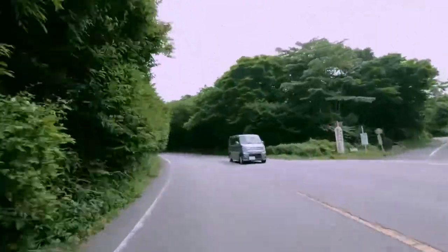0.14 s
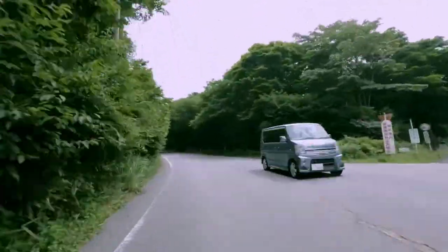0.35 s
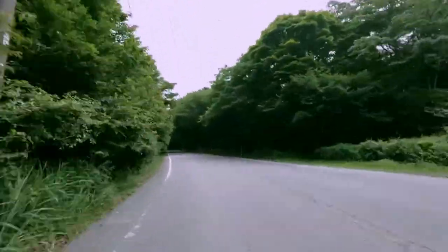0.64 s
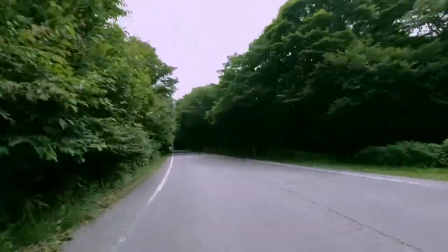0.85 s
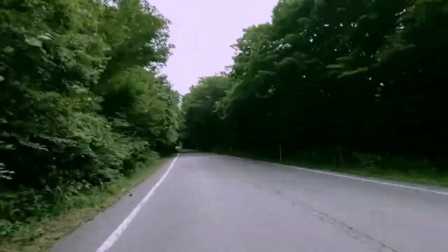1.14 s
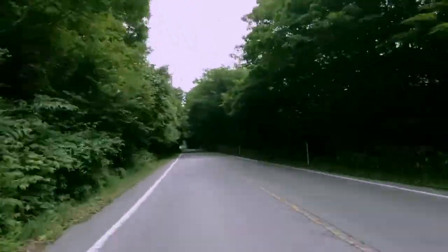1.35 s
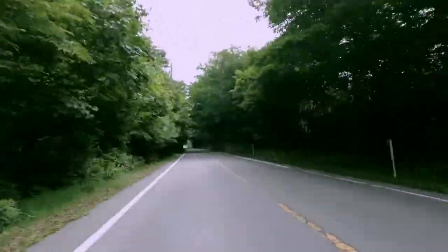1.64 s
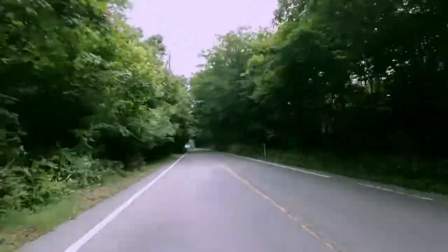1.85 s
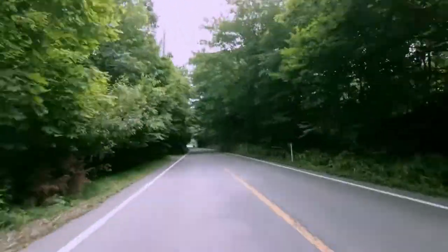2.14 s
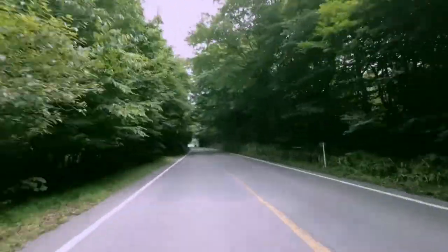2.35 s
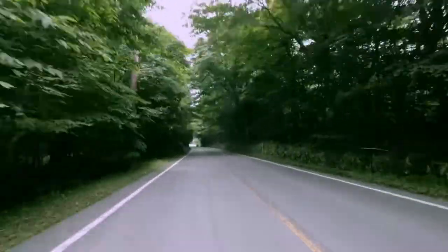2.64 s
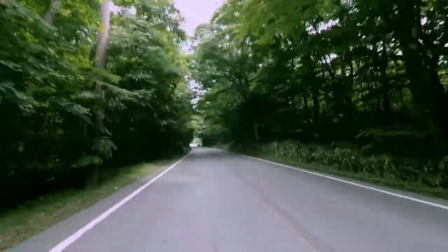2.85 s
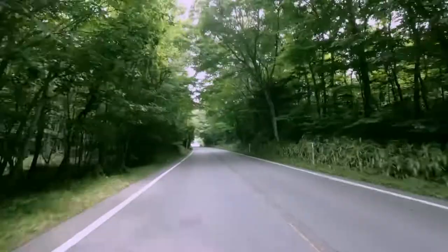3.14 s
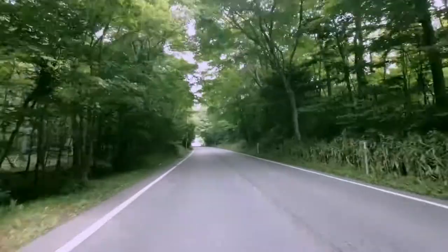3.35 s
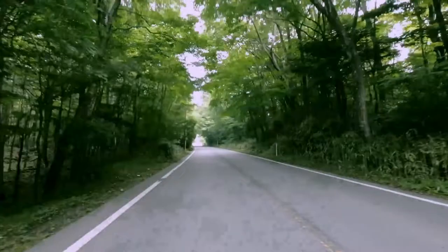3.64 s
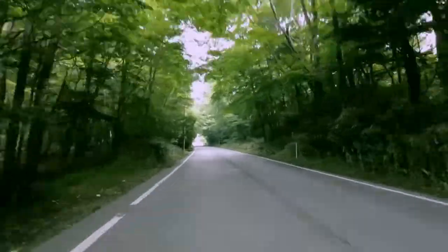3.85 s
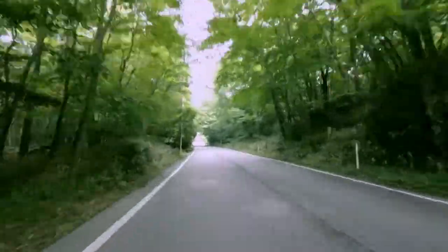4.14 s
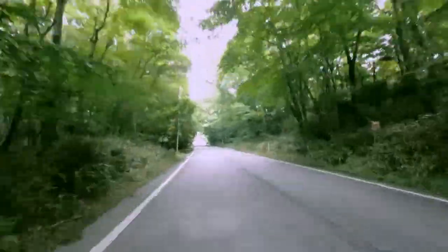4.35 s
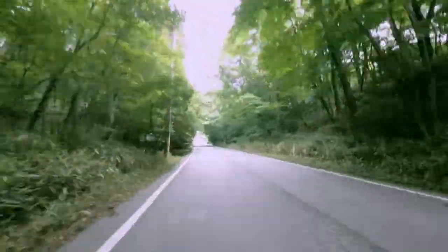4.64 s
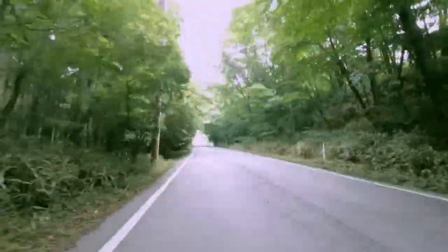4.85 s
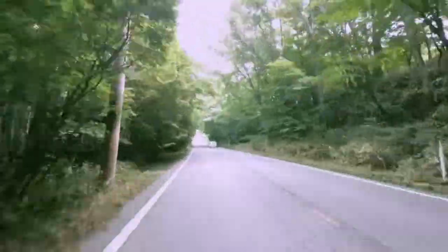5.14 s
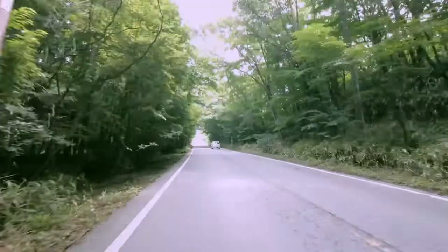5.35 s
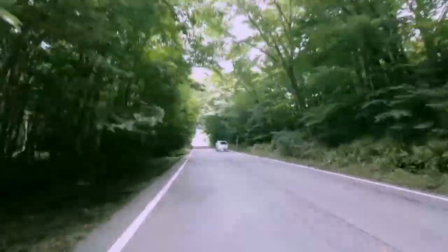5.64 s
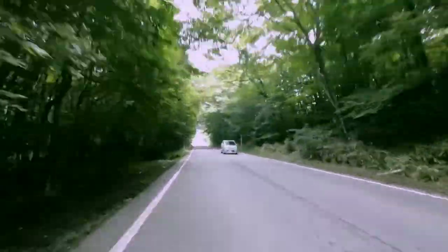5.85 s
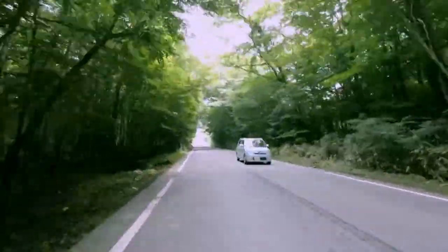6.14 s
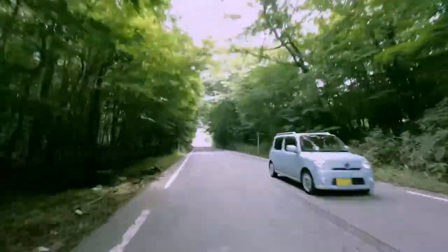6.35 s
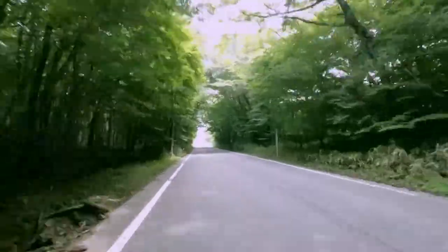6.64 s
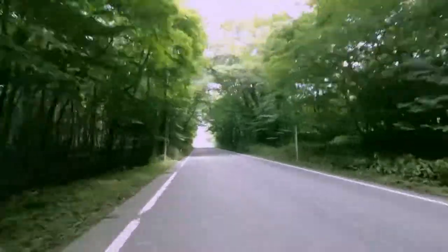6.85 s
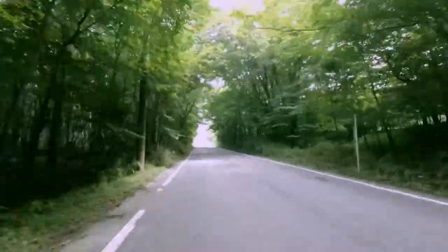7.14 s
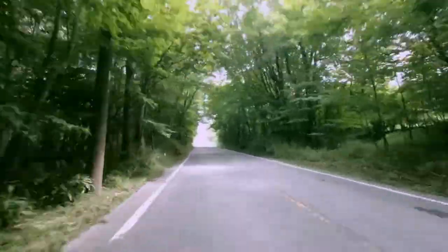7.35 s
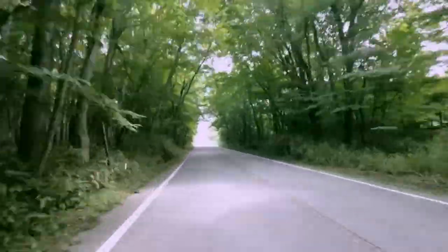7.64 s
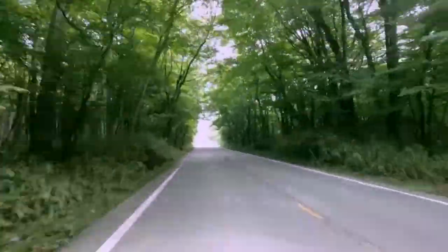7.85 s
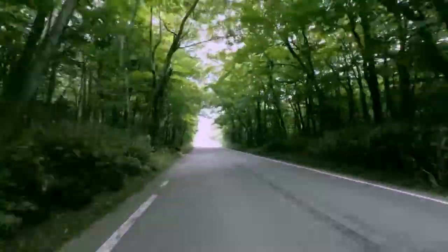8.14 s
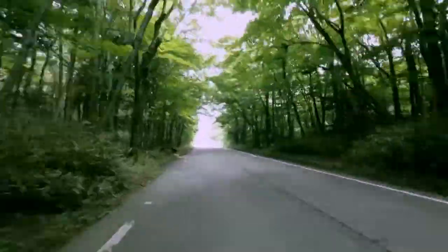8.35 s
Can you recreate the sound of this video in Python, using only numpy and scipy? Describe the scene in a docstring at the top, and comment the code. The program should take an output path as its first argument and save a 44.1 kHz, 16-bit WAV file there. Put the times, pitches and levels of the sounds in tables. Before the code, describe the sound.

A motorcycle ride on an open forest road, heard in mono from a microphone fixed to the bike, close and without noticeable echo. From 0 s the twin-cylinder engine is already running: a deep, muffled exhaust throb, two unevenly spaced pulses per cycle, about 23 cycles a second. A brief easing at 0.25 s is followed by firmer throttle from 0.4 to 1.3 s, then the load relaxes towards a light cruise by about 5.6 s. The pitch climbs smoothly throughout, reaching about 27 cycles a second by 8.5 s. Fine valve ticks, a dull knock, cycle-pulsed hiss, low hum, and thin high rings and whine overlay it. Tyre and air roar stays steady with slight flicker. Soft low wind thumps begin around 1.6 s, cluster with heavier buffeting from 6.2 to 7.4 s as air is stirred behind an oncoming car, then thin out. The engine continues to the end.

```python
"""The uneven beat of a twin-cylinder motorcycle's exhaust is heard first, over roaring tyres and wind; it slowly
gains speed on a forest road, the microphone riding on the bike. Two unevenly spaced firings a cycle excite the
modes of the exhaust; filtered noise and pulses locked to the cycle make pulsing hiss, thin rings and valve ticks;
sinusoids at multiples of the cycle rate make hum and steady high partials. Shaped noise gives the tyre and air
roar; low rumble and brief decaying oscillations give the wind and gusts thumping the microphone."""
import sys
import numpy as np
from scipy import signal
from scipy.fft import rfft, irfft, next_fast_len
from scipy.io import wavfile
from scipy.ndimage import uniform_filter1d

SR = 44100
rng = np.random.default_rng(int(sys.argv[2]) if len(sys.argv) > 2 else 0)


def log_audio(samples):
    """Write samples as a 16-bit WAV file to the path given in sys.argv[1]."""
    # one column per channel
    frames = np.atleast_2d(samples).T
    # limit to full scale, then quantise
    limited = np.clip(frames, -1, 1)
    pcm = np.round(limited * 32767).astype(np.int16)
    wavfile.write(sys.argv[1], SR, pcm)


N = 374850

# Rate of the four-stroke cycle: [t/s, f/Hz]
CYCLE_RATE = [(0.0, 23.262), (0.4, 23.526), (0.8, 23.817), (1.2, 24.178), (1.7, 24.546), (2.3, 24.825),
              (3.0, 25.074), (3.8, 25.478), (4.6, 25.846), (5.4, 26.126), (6.2, 26.369), (7.0, 26.636),
              (7.8, 26.868), (8.5, 27.052)]
# Engine load, a squeeze of throttle out of the bend, then easing to a cruise: [t/s, load from 0 to 1]
ENGINE_LOAD = [(0, 0.8), (.25, .55), (.4, .95), (1.3, 0.8), (1.9, 0.41), (3, 0.27), (4.5, .22), (5.6, 0.08),
               (8.5, 0.01)]
# Relative spectrum of tyres, air and microphone hiss: [f/Hz, density level/dB per Hz]
ROAD_SPECTRUM = [(90, -11), (150, -8.5), (290, -13), (360, -16), (490, -13.5), (830, -18), (1100, -19),
                 (1600, -33), (2300, -37), (3100, -39.5), (4100, -44), (5700, -49.5), (8300, -53.5),
                 (12000, -52), (14000, -71), (15600, -54)]
# Gust thumps: [t/s, level/dB before the wind low-pass, f/Hz, 1/e half-length/s]
GUST_THUMPS = [(1.558, -22, 42, .009), (1.787, -23, 54, .009), (2.545, -21, 119, .008),
               (2.637, -26, 58, .01), (3.232, -25, 63, .008), (3.836, -21, 51, .008),
               (3.928, -24, 44, .008), (4.491, -21, 45, .009), (5.009, -22, 101, .014),
               (5.064, -24, 39, .008), (5.7, -25, 48, .009), (6.239, -20, 58, .009), (6.385, -19, 66, .008),
               (6.436, -19, 83, .008), (6.586, -20, 78, .008), (6.625, -21, 130, .008),
               (6.671, -23, 41, .008), (6.785, -21, 68, .01), (6.896, -21, 82, .008),
               (7.018, -17.5, 85, .011), (7.257, -21, 84, .008), (7.372, -18, 64, .009),
               (7.409, -17, 60, .008), (7.445, -21, 34, .008), (7.719, -22, 65, .009),
               (8.096, -22, 57, .01), (8.19, -26, 41, .01)]
# Steady high partials: [multiple of the cycle rate], and their relative amplitudes: [level/dB]
PARTIAL_MULTIPLES = [35, 36, 51, 60, 81]
PARTIAL_BALANCE = [-60, -57, -50, -56, -59]
# Hum locked to the crank: [multiple of the cycle rate, level/dB, gain with speed/dB, lag/own period]
CRANK_HUM = [(19, -50, -3, .19), (21, -53, 7, .27), (22, -47.5, -2, .39)]
# Noise bands pulsing with the cycle, the 10600 Hz row a broad pulsing treble hiss:
# [f/Hz, width/Hz, level/dB, swell position/cycle, swell/dB (negative dips), sharpness]
PULSING_BANDS = [(277.4, 55, -42.5, 0.2, 6.5, 1.2), (611, 164, -45.5, 0.41, 2.5, 0.86),
                 (1300, 1060, -41, 0.16, 4.5, 1.7), (2140, 980, -47.5, 0.032, 1.5, 0.58),
                 (3390, 340, -58, 0.056, 2, 0.85), (3576, 230, -64, 0.13, 7, 1.8),
                 (4410, 950, -59.5, 0.14, -2.5, 0.27), (6160, 140, -72.5, 0.77, 9, 2),
                 (6720, 330, -71.5, 0.99, 7, 2), (7830, 190, -72, 1, 7, 2),
                 (10600, 10700, -60, 0.84, 8, 8.6)]
# Valve gear ticks, the rows just before the cycle start (.94 to .99) being further resonances of the knock near
# the first firing: [position/cycle, f/Hz, width/Hz, level/dB, gain with speed/dB]
VALVE_TICKS = [(.635, 945, 60, -51, -2), (.7, 1020, 130, -51, -6), (.21, 1000, 150, -50.5, -6),
               (.55, 980, 88, -53, 2), (.2, 1365, 60, -57, 6), (.56, 1450, 90, -57, 7),
               (.94, 1620, 160, -49, -2), (.45, 1580, 60, -53, 6), (.82, 1500, 120, -56, 6),
               (.12, 1720, 110, -51, -2), (.54, 1990, 70, -53, -1), (.68, 1800, 60, -55, 0),
               (.97, 2050, 200, -56, 3), (.46, 2200, 160, -54, 0), (.22, 2300, 200, -57, -2),
               (.98, 2550, 300, -57, -2), (.82, 2750, 200, -64, -1), (.99, 3520, 200, -62.5, 0),
               (.17, 3500, 200, -62, -1), (.28, 3450, 160, -63, -1), (.97, 4800, 300, -66.5, -3),
               (.14, 4890, 160, -66, -5), (.04, 4150, 200, -69, -6)]
# Exhaust modes: [f/Hz, width/Hz, signed share of first cylinder, of second cylinder, gain at full load/dB]
PIPE_MODES = [(54, 30, -.291, -.493, 3.2), (74, 13, .281, -.399, 4.8), (86, 113, .256, .714, 3.9),
              (106, 36, -.682, -.819, 5.1), (159, 55, .087, -.228, 1.1), (204, 35, .02, .038, 14.6),
              (234, 70, -.027, -.112, 9.9), (275, 40, -.057, -.12, -9.3), (293, 112, .279, .475, 1.1),
              (321, 155, -.367, -.645, 1.8), (347, 105, .186, .315, 3.0), (391, 20, -.044, -.015, -1.6),
              (409, 17, .006, -.04, 5.6), (438, 77, .036, .066, -.7), (562, 18, .03, .028, -5.3)]

# Level laws: (base/dB, gain at full load/dB, gain from first to last speed/dB)
PIPE_DB, KNOCK_DB, WIND_DB = (-16, -2, 5), (-42, 2.5, -4), (-37.5, 8.5, 2.5)
LOW_RING_DB, HIGH_RING_DB, PARTIALS_DB = (-66, 1, -3), (-87, 4, 23), (-8.5, -8, 13.5)
ROAD_DB = -35.5
BUFFET_S, BUFFET_LENGTH_S, BUFFET_DB = 6.4, 0.86, 6  # stirred air behind an oncoming car
START_PHASE = .428  # share of the cycle already run at the start
FIRST_PHASE, SECOND_PHASE = -.026, .604  # shares of the cycle at which the cylinders blow into the pipe
LEAD_S = .2  # the engine is already running, so the pipe rings from the first moment
MUFFLER_HZ = 650  # the silencer dulls the pipe above this
TOP_HZ = 15830  # recorder cutoff


def undb(db):
    """Amplitude ratio: a level of 20 dB is a factor of ten."""
    return 10 ** (np.asarray(db) / 20)


def level(x, db):
    """Normalisation: scale to a given rms level."""
    return x * undb(db) / np.sqrt(np.mean(x ** 2))


def law(shares_db, load, speed):
    """Superposition of level changes: base plus gains proportional to load and to speed."""
    base, load_gain, speed_gain = shares_db
    return base + load_gain * load + speed_gain * speed


def curve(table):
    """Linear interpolation: columns of a table joined by straight lines in time."""
    s, *columns = np.transpose(table)
    return [np.interp(np.arange(N) / SR, s, c) for c in columns]


def band(x, hz, width):
    """Simple resonance: two poles, gain 1 at the centre."""
    return signal.lfilter(*signal.iirpeak(hz, hz / width, fs=SR), x)


def steep(x, hz, width):
    """Cascaded resonance: two equal resonators in series steepen the skirts."""
    return band(band(x, hz, width), hz, width)


def noise():
    """White noise: equal mean power at every frequency."""
    return rng.standard_normal(N)


def walk(rate):
    """Slow fluctuation: random levels held 1 / rate s, smoothed twice, with standard deviation 1."""
    k = int(SR / rate)
    steps = np.repeat(rng.standard_normal(N // k + 1), k)
    x = uniform_filter1d(uniform_filter1d(steps, k), k)[:N]
    return x / x.std()


def pulses(phase, at, scatter_db, jitter_s):
    """Periodic impulses: one a cycle, each a little early or late, strong or weak."""
    cycle = np.arange(np.ceil(phase[0] - at), phase[-1] - at)
    chance = rng.standard_normal((len(cycle), 2))
    place = np.interp(cycle + at, phase, np.arange(len(phase))) + jitter_s * SR * chance[:, 0]
    place = np.clip(place, 0, len(phase) - 2)
    strength = undb(scatter_db * chance[:, 1])
    # Share each impulse between the two nearest samples
    whole, out = place.astype(int), np.zeros(len(phase))
    out[whole] += strength * (1 + whole - place)
    out[whole + 1] += strength * (place - whole)
    return out


def swell(phase, at, depth_db, sharp):
    """Periodic modulation: gain that peaks once a cycle, or dips where the depth is negative."""
    return undb(depth_db * np.exp(sharp * (np.cos(2 * np.pi * (phase - at)) - 1)))


def uneven(phase, scatter_db):
    """Cyclic variation: gain that differs from cycle to cycle."""
    cycle = np.arange(np.floor(phase[0]) - 1, phase[-1] + 1)
    return undb(scatter_db * np.interp(phase, cycle + .15, rng.standard_normal(len(cycle))))


def road():
    """Broadband noise: tyre and air roar in overlapping slices whose levels flicker independently."""
    hz, db = np.transpose(ROAD_SPECTRUM)
    size = next_fast_len(N)
    octave = np.log2(np.arange(1, size // 2 + 2) * SR / size)
    roar = rfft(rng.standard_normal(size)) * undb(np.interp(octave, np.log2(hz), db))
    out = 0
    for centre in np.arange(6.5, 14.6, .5):  # log2 of f/Hz, half an octave apart
        flicker = undb(.6 * walk(9) + .6 * walk(.7))
        weight = np.clip(1 - 2 * abs(octave - centre), 0, 1)
        out = out + flicker * irfft(roar * weight, size)[:N]
    return level(out, ROAD_DB)


def wind(load, speed):
    """Turbulent pressure: patchy low rumble at the microphone, with short thumps where gusts strike."""
    buffet_db = BUFFET_DB * np.exp(-((np.arange(N) / SR - BUFFET_S) / BUFFET_LENGTH_S) ** 2)
    patchy = level(band(noise(), 50, 90) * undb(5 * walk(14)), 0)
    rumble = patchy * undb(law(WIND_DB, load, speed) + buffet_db)
    for s, db, hz, long_s in GUST_THUMPS:
        near = slice(int((s - 3 * long_s) * SR), int((s + 3 * long_s) * SR))
        lag = np.arange(N)[near] / SR - s
        envelope = np.sqrt(2) * undb(db) * np.exp(-(lag / long_s) ** 2)
        rumble[near] += envelope * np.sin(2 * np.pi * (hz * lag + rng.random()))
    return signal.sosfilt(signal.butter(2, 220, fs=SR, output="sos"), rumble)


def high_partials(phase, load, speed):
    """Harmonic series: steady high partials at whole multiples of the cycle rate, slowly wavering in level."""
    partials = 0
    for multiple, db in zip(PARTIAL_MULTIPLES, PARTIAL_BALANCE):
        waver = undb(db + 1.2 * walk(1.9))
        partials = partials + waver * np.sin(2 * np.pi * (multiple * phase + rng.random()))
    return undb(law(PARTIALS_DB, load, speed)) * partials


def crank_hum(phase, speed):
    """Phase locking: sinusoids keep a fixed lag to the crank as the rate rises."""
    return sum(undb(db + more_db * speed) * np.sin(2 * np.pi * (multiple * phase - lag))
               for multiple, db, more_db, lag in CRANK_HUM)


def thin_rings(phase, load, speed):
    """Narrow-band resonance: rings near 4.9 and 5.4 kHz, pulsing each cycle, trade places with speed."""
    low = noise() * swell(phase, .12, 13, 1.2) * uneven(phase, 1.5)
    high = noise() * swell(phase, .1, 13, 1.2) * uneven(phase, 1.5)
    low = level(steep(low, 4880, 190), 0)
    high = level(steep(high, 5400, 130), 0)
    return undb(law(LOW_RING_DB, load, speed)) * low + undb(law(HIGH_RING_DB, load, speed)) * high


def pulsing_noise(phase):
    """Modulated noise: each band is filtered from noise whose level varies in step with the cycle."""
    return sum(level(steep(noise() * swell(phase, at, depth_db, sharp), hz, width), db)
               for hz, width, db, at, depth_db, sharp in PULSING_BANDS)


def valve_ticks(phase, speed):
    """Impulse response: each tick rings its own resonance once a cycle; the rows just before the cycle start
    add higher resonances to the knock's click."""
    out = 0
    for at, hz, width, db, more_db in VALVE_TICKS:
        hits = pulses(phase, at, scatter_db=1 + hz / 2500, jitter_s=.00003)
        out = out + level(steep(hits, hz, width), db) * undb(more_db * speed)
    return out


def knock(phase, load, speed):
    """Impact excitation: the first firing knocks a case resonance, a little harder on some cycles."""
    hits = pulses(phase, -.01, scatter_db=1.2, jitter_s=.00005)
    return undb(law(KNOCK_DB, load, speed)) * level(steep(hits, 1090, 190), 0)


def exhaust(phase, load, speed):
    """Modal superposition: each cylinder drives the same pipe modes in its own shares; load shifts the balance."""
    lead = phase[0] - CYCLE_RATE[0][1] * np.arange(int(LEAD_S * SR), 0, -1) / SR
    phase = np.r_[lead, phase]
    puff = np.hanning(int(.0016 * SR))  # the valve opens over a millisecond or two, so the puff is soft
    first = np.convolve(pulses(phase, FIRST_PHASE, scatter_db=0.5, jitter_s=.00005), puff, "same")
    second = np.convolve(pulses(phase, SECOND_PHASE, scatter_db=-0.25, jitter_s=.00006), puff, "same")
    pipe = 0
    for hz, width, share_1, share_2, load_db in PIPE_MODES:
        mode = band(share_1 * first + share_2 * second, hz, width)[-N:]
        pipe = pipe + undb(load_db * load) * mode
    muffled = level(signal.lfilter(*signal.butter(2, MUFFLER_HZ, fs=SR), pipe), 0)
    return undb(law(PIPE_DB, load, speed)) * muffled


def scene():
    """Linear superposition: crank phase, load and speed govern the engine layers; the road roar is independent."""
    rate, load = curve(CYCLE_RATE)[0], np.clip(curve(ENGINE_LOAD)[0], 0, 1)
    phase = START_PHASE + np.cumsum(rate) / SR  # in four-stroke cycles
    speed = (rate - rate[0]) / (rate[-1] - rate[0])  # 0 at the start, 1 at the end
    background = road() + wind(load, speed)
    tones = high_partials(phase, load, speed) + crank_hum(phase, speed) + thin_rings(phase, load, speed)
    clatter = pulsing_noise(phase) + valve_ticks(phase, speed) + knock(phase, load, speed)
    mix = background + tones + clatter + exhaust(phase, load, speed)
    return mix[None]


def record(dry):
    """Band limitation: the microphone drops the deepest bass; the recorder cuts the top."""
    thin = signal.sosfilt(signal.butter(2, 22, "high", fs=SR, output="sos"), dry)
    return signal.sosfilt(signal.ellip(10, .2, 80, TOP_HZ, fs=SR, output="sos"), thin)


dry = scene()
out = record(dry)
log_audio(out)
```